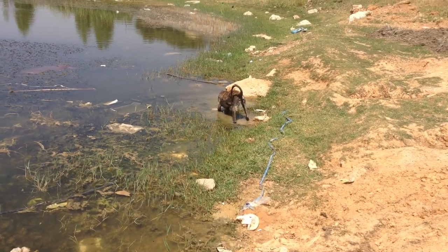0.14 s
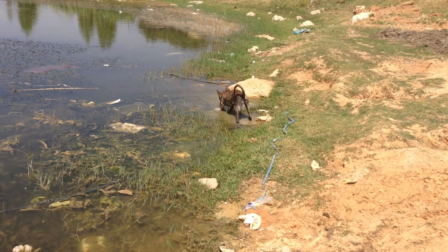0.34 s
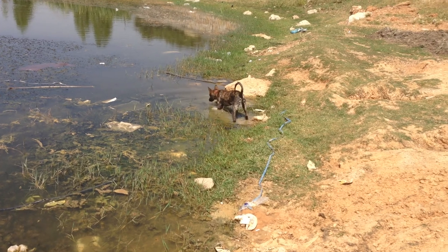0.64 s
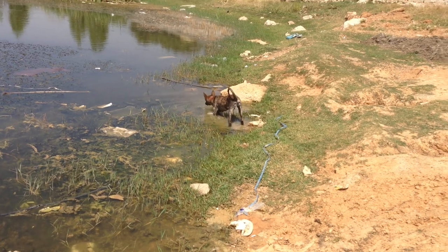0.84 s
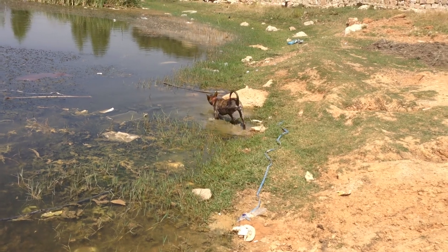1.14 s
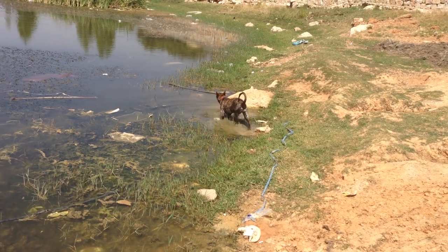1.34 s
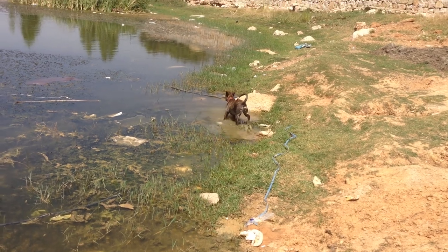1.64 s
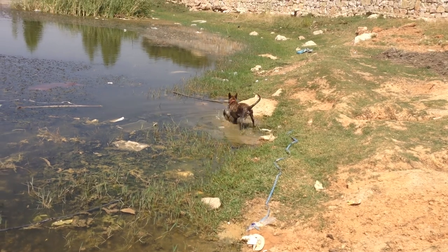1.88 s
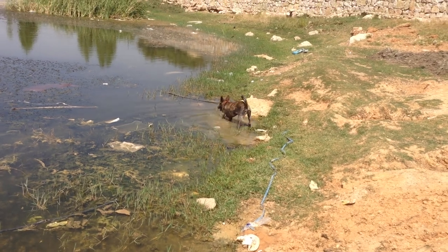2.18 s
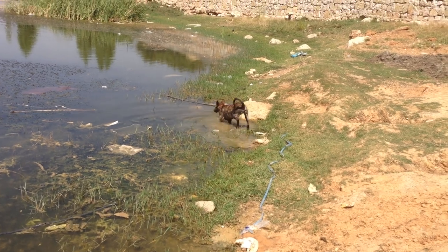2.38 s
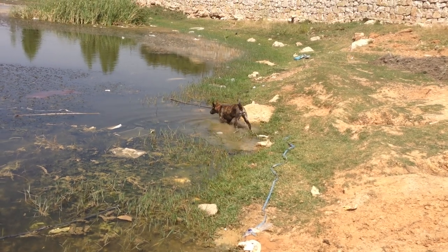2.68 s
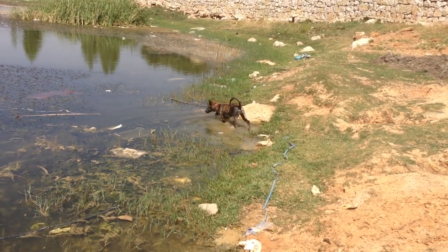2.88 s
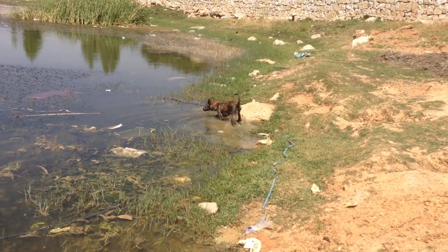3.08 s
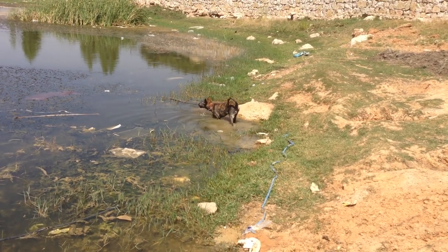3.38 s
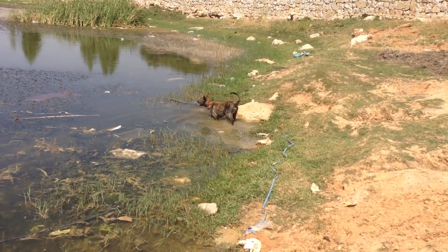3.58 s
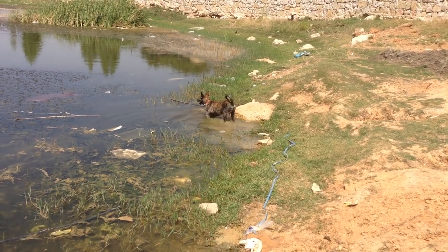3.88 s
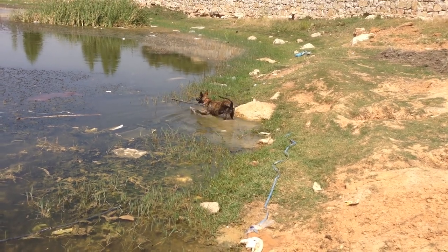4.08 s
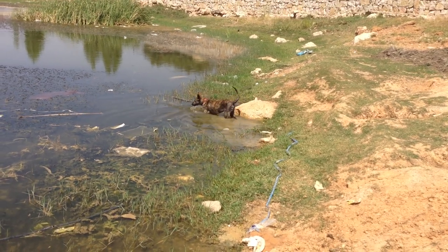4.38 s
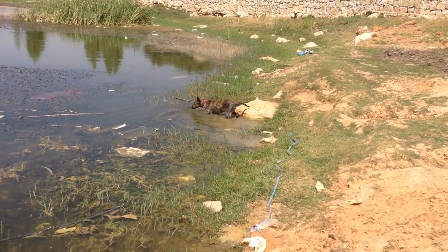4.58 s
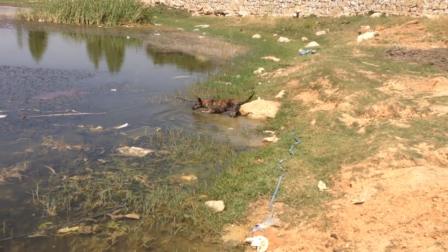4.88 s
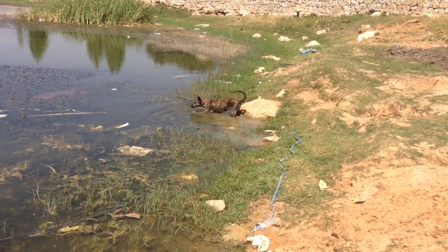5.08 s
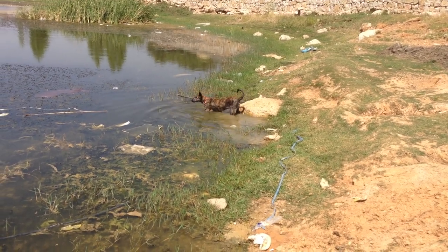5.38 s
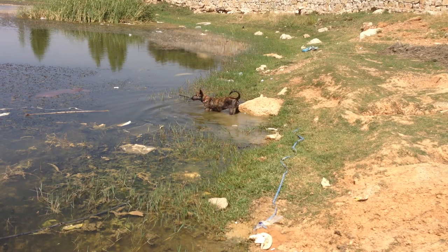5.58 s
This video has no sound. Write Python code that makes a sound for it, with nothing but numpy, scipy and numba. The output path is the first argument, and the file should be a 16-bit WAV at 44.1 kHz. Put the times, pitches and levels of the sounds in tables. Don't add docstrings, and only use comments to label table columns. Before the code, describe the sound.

A dog wades at a pond edge some metres away, making small irregular splashes, bubbling gurgles, drips and bright droplet ticks. Soft wind thumps open the scene, then a brittle snap cracks very close to the phone. A small bird whistles briefly far off a few times. Open, dry outdoor space with faint steady hiss; wind bumps return at the end.

```python
import sys
import numpy as np
from scipy import signal
from scipy.fft import rfft, irfft
from scipy.io import wavfile
from scipy.ndimage import uniform_filter1d
from numba import njit

SR = 44100
rng = np.random.default_rng(int(sys.argv[2]) if len(sys.argv) > 2 else 0)


def invert_db(level):
    return 10 ** (np.asarray(level, dtype=float) / 20)


def dump_mix(stems):
    frames = np.atleast_2d(stems).T
    limited = np.clip(frames, -1, 1)
    pcm = np.round(limited * 32767).astype(np.int16)
    wavfile.write(sys.argv[1], SR, pcm)


N = 252693
T = np.arange(N) / SR


def level(x, db):
    return x * invert_db(db) / np.sqrt(np.mean(x ** 2))


def colour(x, points):
    hz, db = np.transpose(points)
    f = np.arange(N // 2 + 1) * SR / N + 1
    gain_db = np.interp(np.log(f), np.log(hz), db)
    return irfft(rfft(x) * invert_db(gain_db), N)


def band(x, lo_hz, hi_hz):
    return signal.sosfilt(signal.butter(2, [lo_hz, hi_hz], "bandpass", fs=SR, output="sos"), x)


def walk(rate):
    hold = int(SR / rate)
    steps = np.repeat(rng.standard_normal(N // hold + 1), hold)
    return 1.2 * uniform_filter1d(steps, hold)[:N]


def swells(table, edge_s, extra_db=0.):
    starts, lengths, db = np.transpose(table)[:3]
    gain = np.zeros(N)
    for start, length, peak in zip(starts, lengths, invert_db(db + extra_db)):
        ease_in = np.clip((T - start) / edge_s, 0, 1) ** 2
        ease_out = np.clip((start + length + edge_s - T) / edge_s, 0, 1) ** 2
        gain += peak * ease_in * ease_out
    return gain


@njit
def rings(s, hz, t60, rise, size, attack):
    out = np.zeros(N)
    for k in range(len(s)):
        start, count, phase = int(s[k] * SR), int(t60[k] * SR) + 2, 0.
        for i in range(min(count, N - start)):
            phase += min(hz[k] * (1 + rise[k] * i / count) / SR, .45)
            fade = min(phase / attack, 1.) * np.exp(-6.9 * i / count)
            out[start + i] += size[k] * fade * np.sin(2 * np.pi * phase)
    return out


def clicks(table, cycles, attack, gain_db):
    s, db, hz = np.transpose(table)
    return rings(s, hz, cycles / hz, 0 * s, invert_db(db + gain_db), attack)


def hiss():
    # pitch_hz [Hz], level_db [dB per Hz]
    hiss_tone = [(15, -70), (25, -31), (54, -23.5), (125, -5.5), (238, 1.5), (418, -3), (1100, -4),
                 (1220, -5), (1880, -8.5), (2810, -9.5), (6440, -12.5), (14000, -12.5), (15200, -11.5)]
    return level(colour(rng.standard_normal(N), hiss_tone), -69.5)


def wind():
    # start_s [s], length_s [s], level_db [dB], pitch_hz [Hz]
    gust_table = [(-.03, 0.049, -68, 144), (0.173, 0.15, -67.5, 144), (0.42, .12, -68, 146),
                  (1.46, .05, -69, 120), (4.446, 0.051, -73.5, 110), (4.63, 0.028, -62, 141),
                  (4.788, 0.13, -76.5, 111), (4.93, 0.081, -60.5, 141), (5.008, 0.11, -55, 154),
                  (5.15, 0.088, -71, 120), (5.247, 0.082, -64, 106), (5.366, .06, -71, 91.2),
                  (5.439, .06, -60, 137), (5.554, .05, -75, 99), (5.63, 0.094, -71, 150)]
    # start_s [s], peak_db [dB], pitch_hz [Hz]
    thump_table = [
        (0.145, -69.5, 114),
        (0.201, -61, 212),
        (0.246, -56.5, 180),
        (0.359, -59.5, 130),
        (0.384, -58.5, 182),
        (4.953, -58.5, 167),
        (5.506, -58.5, 132),
        (5.528, -62.5, 218),
    ]
    span = 1.5
    turbulence = rng.standard_normal(N) * invert_db(2.365 * walk(39))
    out = clicks(thump_table, cycles=5.4, attack=0.35, gain_db=12.5)
    for row in gust_table:
        lo_hz, hi_hz = row[3] / span, row[3] * span
        rumble = band(band(turbulence, lo_hz, hi_hz), lo_hz, hi_hz)
        out += level(rumble, -2.9) * swells([row], edge_s=0.0296)
    return out


def bird():
    # time_s [s from its start], pitch_hz [Hz], level_db [dB]
    call_shape = [
        (0, 3000, -12),
        (.014, 4550, -3),
        (.028, 4550, -2),
        (.038, 3650, -1),
        (.055, 2950, -3),
        (.064, 3400, -8),
        (.073, 3850, -1),
        (.086, 3100, 1),
        (.12, 2600, -9),
    ]
    # start_s [s], level_db [dB], shift_hz [Hz added to the arches]
    repeats = [
        (.217, -65, -120),
        (2.776, -65.5, 100),
        (3.83, -64, 98.5),
        (4.691, -64, 50),
        (5.2, -78.5, 51),
    ]
    out = np.zeros(N)
    for start, call_db, up_hz in repeats:
        s, hz, db = np.transpose(call_shape) + np.array([[start], [up_hz], [call_db]])
        buzz = np.sin(2 * np.pi * np.cumsum(600 + 130 * walk(200)) / SR)
        pitch = np.interp(T, s, hz) * (1 + .04 * walk(400))
        phase = 2 * np.pi * np.cumsum(pitch) / SR + .65 * buzz
        loudness_db = np.interp(T, s, db + 1.5, -150, -150) + 3.4 * walk(320)
        out += invert_db(loudness_db) * np.sin(phase)
    echoes = np.zeros(N)
    for late in rng.random(9):
        delay_s = .004 + .035 * late
        echoes += invert_db(-13 - 8 * late) * np.roll(out, int(delay_s * SR))
    return out + echoes


def snap():
    # start_s [s], length_s [s], level_db [dB]
    rustle_table = [
        (.288, 0.03, -61),
        (.674, 0.025, -64.5),
        (.692, .03, -77),
        (.85, 0.029, -67),
        (1.12, 0.12, -72),
        (1.3, 0.087, -76),
    ]
    # start_s [s], peak_db [dB], pitch_hz [Hz]
    fibres = [(.5842, -0.5, 11800), (.5869, -4.5, 13460), (.5874, -17, 13800), (.5891, -7.5, 13600),
              (.5898, -0.5, 13000), (.5904, -4.5, 14870), (.5912, -3, 11900), (.5922, -9, 13800),
              (.5932, -8, 13600), (.594, -7, 14160), (.5947, -17.5, 11800), (.5956, -14, 13000),
              (.6027, -28.5, 11500), (.6119, -22, 11800), (.6262, -23.5, 10500)]
    # time_s [s], level_db [dB]
    crackle = [
        (.5835, -98),
        (.5845, -29),
        (.5955, -28.5),
        (.597, -38),
        (.607, -35),
        (.616, -34.5),
        (.639, -40),
        (.642, -70),
        (.66, -90),
    ]
    # start_s [s], peak_db [dB], pitch_hz [Hz]
    jolts = [
        (.5843, -24.5, 6500),
        (.5894, -34.5, 6700),
        (.5898, -27.5, 1500),
        (.5913, -46, 1506),
    ]
    # pitch_hz [Hz], level_db [dB per Hz]
    body = [(1470, -59.5), (2500, -26), (6400, -22), (9580, -8.5), (11400, 3), (13800, 3), (15300, -3.5),
            (15600, -14.5), (16000, -40)]
    grit = level(colour(rng.standard_normal(N) * invert_db(2.8 * walk(1200)), body), 0)
    crackling = invert_db(np.interp(T, *np.transpose(crackle), -150, -150))
    rustling = swells(rustle_table, edge_s=0.0079)
    breaks = band(clicks(fibres, cycles=22.0, attack=0.46, gain_db=3.0), 7200, 16800)
    return breaks + grit * (crackling + rustling) + clicks(jolts, cycles=1.0, attack=0.13, gain_db=0.0)


def swarm(count, lo_hz, hi_hz, cycles, scatter_db, rise, tilt):
    when, pitch, luck, ringing = rng.random((count, 4)).T
    hz = lo_hz * (hi_hz / lo_hz) ** pitch
    size = invert_db(-scatter_db * np.log(1 - .97 * luck)) * hz ** tilt
    t60 = cycles * (0.37 + 0.81 * ringing) / hz
    return level(rings(when * T[-1], hz, t60, rise + 0 * hz, size, 0.79), 0)


def bursts(s, db):
    out = np.zeros(N)
    for start, peak_db in zip(s, db):
        t = np.clip(T - start + .003, 0, None)
        out += invert_db(peak_db - 60 * t / 0.037) * (1 - np.exp(-t / 0.0038))
    return 1.26 * out


def stirring():
    # [dB, small]
    strides = [(0.465, 0.25, -72, -12, -10), (0.808, 0.097, -76, -14, 2.5), (1.005, 0.16, -67.5, -11, -11),
               (1.163, 0.079, -65, -21, -7), (1.254, 0.14, -68, -25, -5), (1.391, 0.15, -72, -3.5, 0),
               (1.656, 0.15, -66.5, -11, -2.3), (1.807, 0.21, -63, -9.5, -8.5),
               (2.034, 0.23, -71.5, -14, -3.5), (2.403, 0.27, -64.5, -27, -7.5), (2.651, .26, -66, -5, -5),
               (2.897, 0.3, -65.5, -19, -4), (3.195, 0.18, -73.5, -1, 0), (3.408, 0.17, -80.5, 7, 1),
               (3.661, 0.087, -67.5, -14, -8.5), (3.759, 0.069, -66, -5, -6.5),
               (3.87, 0.11, -67, -5.5, -12), (3.971, 0.13, -65, -9.5, -6), (4.08, 0.17, -68.5, -16, -6),
               (4.262, 0.12, -72.5, -6, -3.5), (4.395, 0.17, -78, 7, -7), (4.622, 0.2, -69, -10, -6.5),
               (4.827, 0.14, -67, -4, -17), (5.012, 0.098, -69.5, 1, -6)]
    # start_s [s], peak_db [dB], then gurgle_db, patter_db, spray_db [dB against the peak]
    splashes = [(0.5215, -57, -6.5, -9, 6), (0.7073, -47, -29, -9.5, 6), (1.053, -51.5, -3, -20, 1.5),
                (1.3114, -50.5, -15, -5, -2), (1.3418, -40, -24, -18, -8), (1.3597, -61, -22, -6, 10),
                (1.4575, -46, -4.5, -17, -24), (1.4757, -42, -18, -17, -13.5),
                (2.048, -47.5, -24.5, -2.5, -7), (2.0618, -48.5, -29, -2, -7),
                (2.2266, -47, -10.5, -8.5, -9), (2.443, -51, -34, -17, -30),
                (2.6028, -39.5, -17.5, -18, -19), (2.7051, -39.5, -8.5, -9.5, -22),
                (2.785, -56, 1.5, -13, -23), (3.013, -57, -25, 7, -1), (3.1827, -52.5, -14, -7, -17),
                (3.2968, -43, -18, -14, -16), (4.159, -45.5, -25, -6.5, -26), (4.169, -42, -16, -7, -13),
                (4.332, -44, -13, -17.5, -11.5), (4.6512, -45.5, -15.5, -26, -31),
                (4.694, -42.5, -16, -12, -33), (5.0853, -60.5, 5, -16, -7)]
    # start_s [s], peak_db [dB]
    slaps = [
        (0.846, -52),
        (1.1937, -70),
        (1.83, -45.5),
        (3.0227, -53),
        (3.1665, -49),
        (3.6845, -53),
        (3.9006, -53),
        (4.463, -56),
        (4.883, -71),
        (4.9463, -56),
    ]
    # gurgle, patter, spray in dB
    hits = [*splashes, *[(*row, -26, -13.5, -10) for row in slaps]]
    s, db, gurgle_db, patter_db, spray_db = np.transpose(hits)
    depth_db, froth_db = np.transpose(strides)[3:]

    def wash(db, patchy_db):
        return swells(strides, 0.043, db) * invert_db(patchy_db * walk(28))

    gurgle = swarm(count=1500, lo_hz=388.6, hi_hz=971, cycles=23.0, scatter_db=-1.0, rise=0.3, tilt=0.808)
    trickle = swarm(count=4800, lo_hz=860, hi_hz=2500, cycles=19.4, scatter_db=0.5, rise=0.348, tilt=0.58)
    patter = swarm(count=14000, lo_hz=2480, hi_hz=6000, cycles=16.0, scatter_db=3.0, rise=0.13, tilt=-0.47)
    spray = swarm(count=30000, lo_hz=9500, hi_hz=15450, cycles=11., scatter_db=4.5, rise=0.046, tilt=.1)
    out = gurgle * (wash(depth_db - 0.5, patchy_db=4.5) + bursts(s, db + gurgle_db + 5.5))
    out += trickle * (wash(-0.762, patchy_db=1.0) + bursts(s, db - 7))
    out += patter * (wash(froth_db, patchy_db=2.0) + bursts(s, db + patter_db + 0.5))
    out += spray * (wash(froth_db - 10.5, patchy_db=2.0) + bursts(s, db + spray_db - 4))
    return out


def air_pockets(table, t60, rise, attack, gain_db, brood_db):
    s, db, hz = np.transpose(table)
    t60, rise = t60 + 0 * s, rise + 0 * s
    size = invert_db(db + gain_db)
    out = rings(s, hz, t60, rise, size, attack)
    for lag, pitch in rng.random((len(s), 2, 2)).transpose(1, 2, 0):
        later = s + 0.0038 + 0.024 * lag
        out += rings(later, hz * (.85 + .6 * pitch), 0.55 * t60, rise, size * invert_db(brood_db), attack)
    return out


def blips():
    blip_table = [(.518, -56.5, 1055), (.707, -57, 1556), (.864, -54.5, 950), (1.079, -57, 1024),
                  (1.13, -57.5, 1590), (1.341, -59, 945), (1.749, -64, 1230), (1.761, -52.5, 1500),
                  (1.829, -53.5, 1460), (1.916, -52, 1560), (2.184, -53, 903), (2.446, -48.5, 1125),
                  (2.199, -54, 1130), (2.602, -46, 1067), (2.624, -51, 850), (3.086, -52.5, 1066),
                  (3.444, -51, 1206), (2.705, -48, 1098), (2.786, -55.5, 1288), (2.989, -56, 1490),
                  (3.576, -58.5, 1270), (3.879, -48, 980), (3.904, -46.5, 843), (3.744, -58, 1075),
                  (4.158, -43.5, 1296), (4.341, -50.5, 1044), (4.746, -56, 1223), (4.884, -52, 1117),
                  (4.76, -50.5, 1680), (.468, -60, 1538), (5.087, -50.5, 1020)]
    return air_pockets(blip_table, t60=0.039, rise=0.396, attack=0.43, gain_db=0.5, brood_db=-4.0)


def ticks():
    tick_table = [(0.4688, -48, 9910), (0.793, -53, 7440), (0.846, -45.5, 11400), (1.056, -39, 13700),
                  (1.1194, -47, 12500), (1.1963, -46, 13200), (1.3119, -58, 12500), (1.3608, -46, 11600),
                  (1.8654, -52, 12400), (1.9215, -55.5, 12000), (2.0617, -45, 11940), (2.2263, -41, 12320),
                  (2.419, -51, 6440), (3.015, -44, 14400), (3.1832, -43, 14560), (3.2034, -43.5, 11300),
                  (3.2984, -48, 14600), (3.8556, -52, 13900), (4.1719, -47.5, 14400)]
    return band(clicks(tick_table, cycles=16.0, attack=0.98, gain_db=3.5), 5000, 17000)


def drips():
    drip_table = [(0.6924, -49, 3840), (0.885, -48.5, 2140), (1.3123, -45, 1920), (1.3407, -38, 2090),
                  (1.4616, -48, 1780), (1.6909, -44, 2240), (1.746, -44, 1850), (1.83, -43, 1750),
                  (1.8484, -43, 1830), (2.05, -43, 3800), (2.2264, -39, 3800), (2.6039, -30.5, 2810),
                  (2.7031, -42.5, 1730), (3.0086, -47, 2010), (3.111, -43.5, 2500), (3.1356, -51, 2450),
                  (3.1656, -58, 1930), (3.217, -46, 2170), (3.285, -47, 2590), (3.2973, -38, 3040),
                  (3.3552, -52, 2480), (3.6863, -49.5, 2330), (3.9782, -45, 1750), (4.1563, -42, 1750),
                  (4.1712, -39.5, 1960), (4.6507, -46.5, 2003), (3.857, -48, 2360), (4.6747, -43, 1970),
                  (4.697, -44, 2500), (5.0326, -48, 4230)]
    return clicks(drip_table, cycles=24.8, attack=2.16, gain_db=-1.0)


def plops():
    plop_table = [
        (.866, -53.5, 165),
        (1.491, -60.5, 190.4),
        (2.226, -51.5, 242),
        (3.185, -63, 270),
        (3.296, -52.5, 213),
        (4.344, -51, 225),
    ]
    pockets = air_pockets(plop_table, t60=0.084, rise=0.024, attack=0.24, gain_db=6.0, brood_db=-60.0)
    return band(pockets, 230, 900)


def bloops():
    bloop_table = [(0.929, -54.5, 356, 2.65), (1.345, -60.5, 360, 0.16), (1.423, -60, 688, 0.21),
                   (1.456, -51.5, 408, 0.34), (1.459, -52, 638, 0.32), (1.86, -58, 580, 0.47),
                   (2.507, -54.5, 602, .3), (2.704, -58, 334, 0.38), (3.358, -60.5, 330, 0.11),
                   (3.717, -58, 705, .3), (3.783, -58, 625, .4), (3.796, -49, 387, 1.1),
                   (3.811, -52, 752, 0.51), (3.954, -56.5, 817, 0.33), (4.021, -53.5, 716, 0.23),
                   (4.069, -52.5, 743, 0.25), (4.482, -57, 860, .15), (4.968, -52, 390, 0.48)]
    climb = np.transpose(bloop_table)[3]
    rows = [row[:3] for row in bloop_table]
    return air_pockets(rows, t60=0.074, rise=climb, attack=.9, gain_db=0.0, brood_db=-7.5)


def scene():
    water = stirring() + blips() + ticks() + drips() + plops() + bloops()
    water += invert_db(-30) * np.roll(water, int(.0045 * SR))
    return (hiss() + wind() + bird() + snap() + water)[None]


def top_cut(x):
    return signal.sosfilt(signal.butter(12, 16510, fs=SR, output="sos"), x)


def record(dry):
    x = signal.sosfilt(signal.butter(3, 80, "highpass", fs=SR, output="sos"), dry)
    x = .64 * np.tanh(x / .64)
    x = signal.sosfilt(signal.ellip(8, .3, 45, 15300, fs=SR, output="sos"), x)
    return top_cut(x)


dry = scene()
out = record(dry)
dump_mix(out)
```